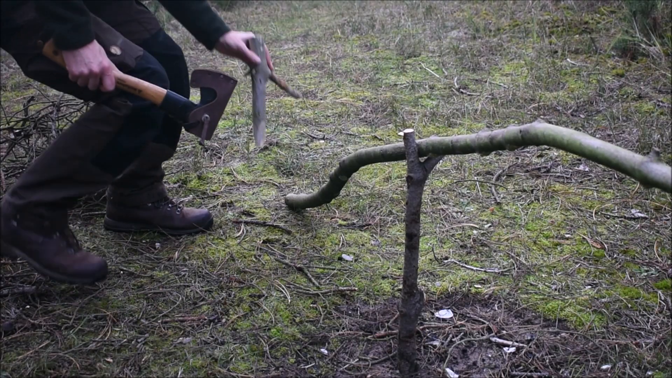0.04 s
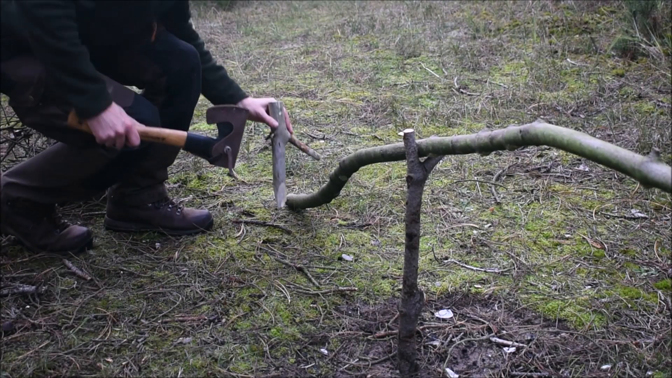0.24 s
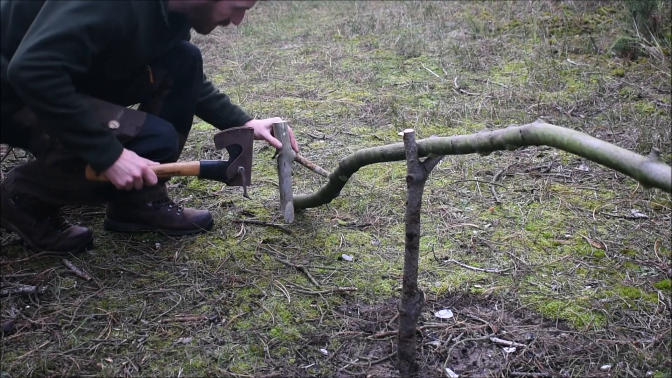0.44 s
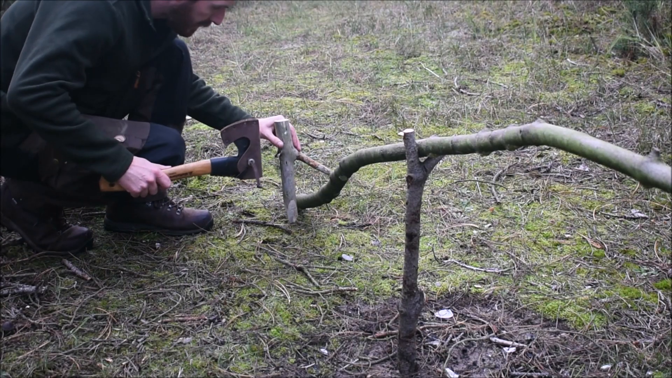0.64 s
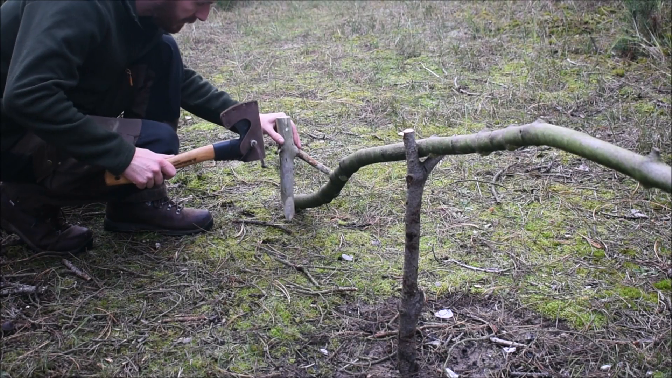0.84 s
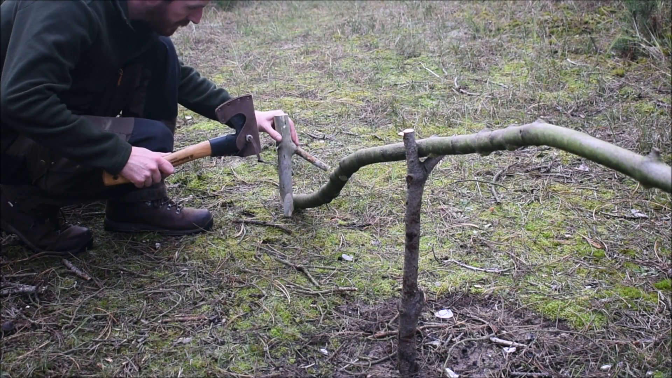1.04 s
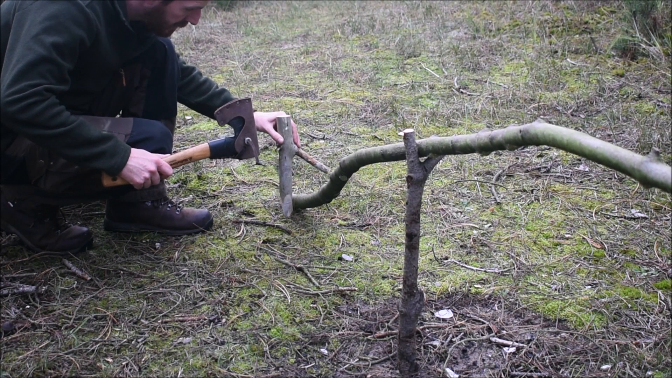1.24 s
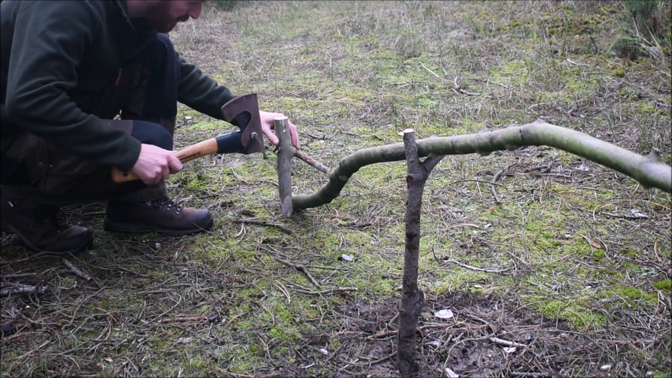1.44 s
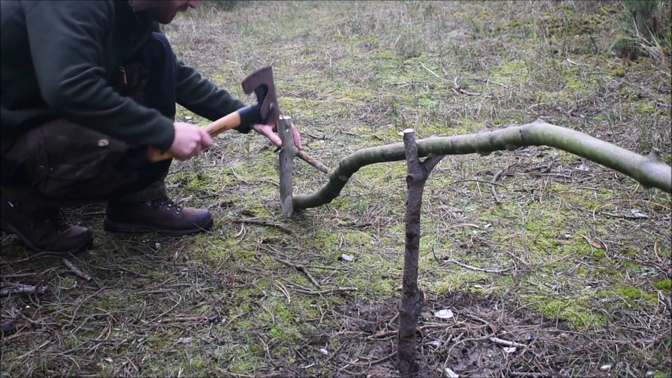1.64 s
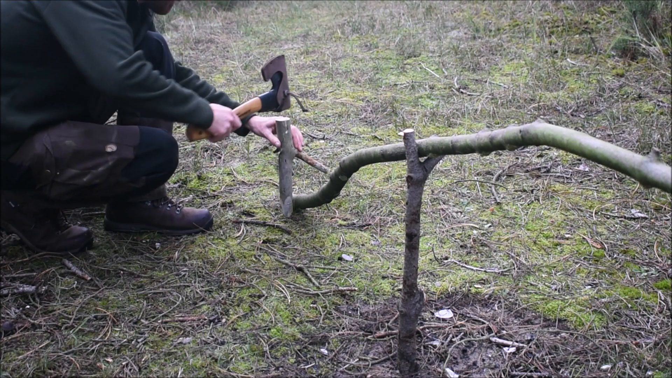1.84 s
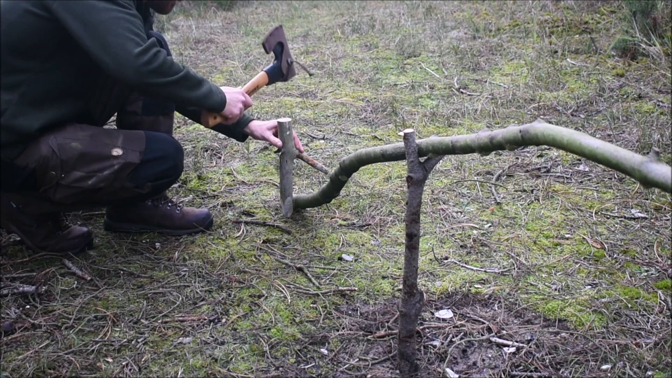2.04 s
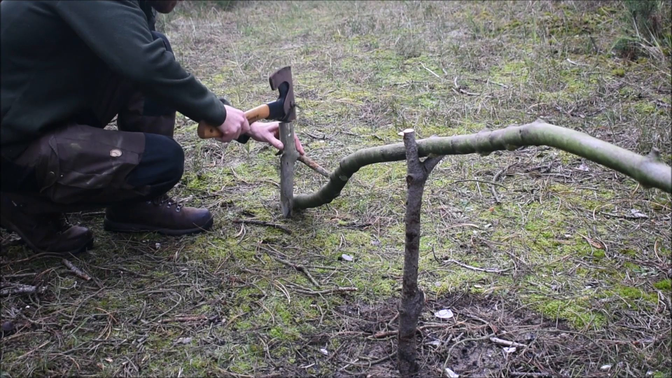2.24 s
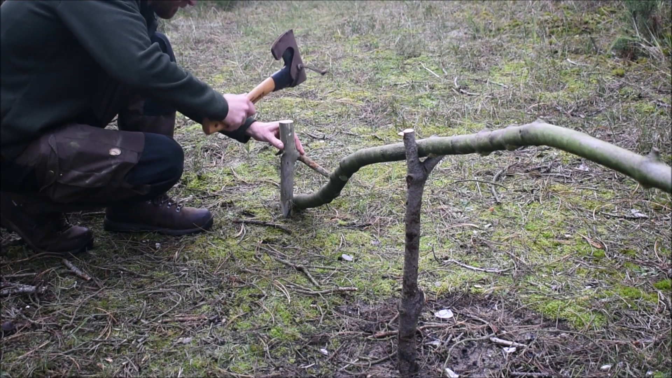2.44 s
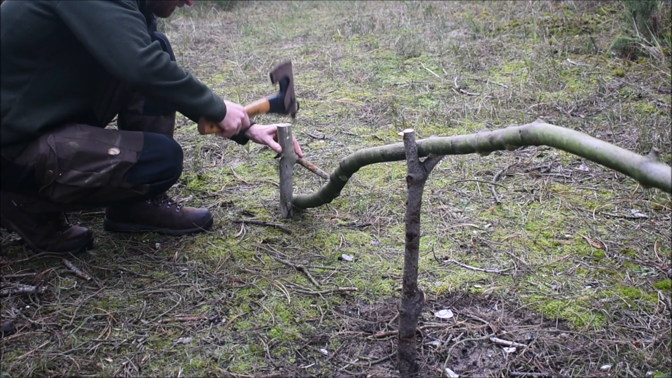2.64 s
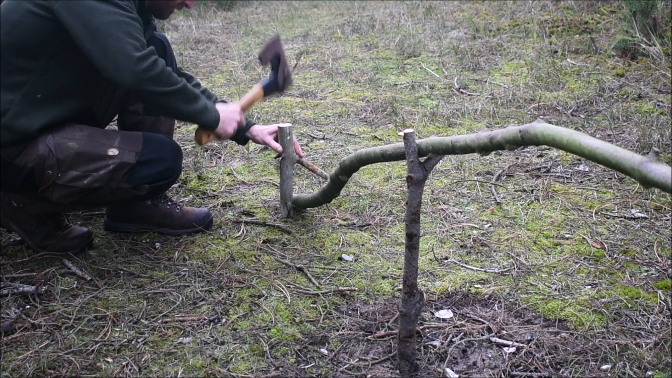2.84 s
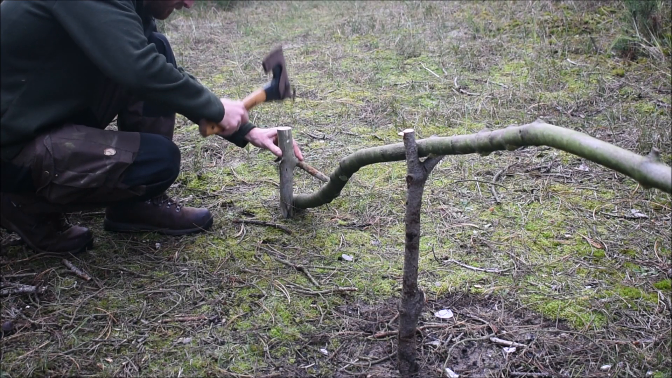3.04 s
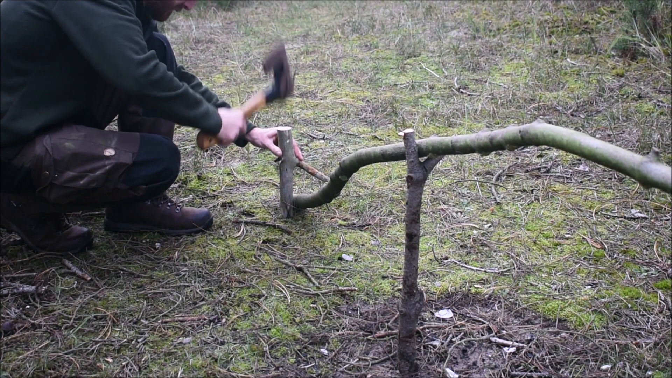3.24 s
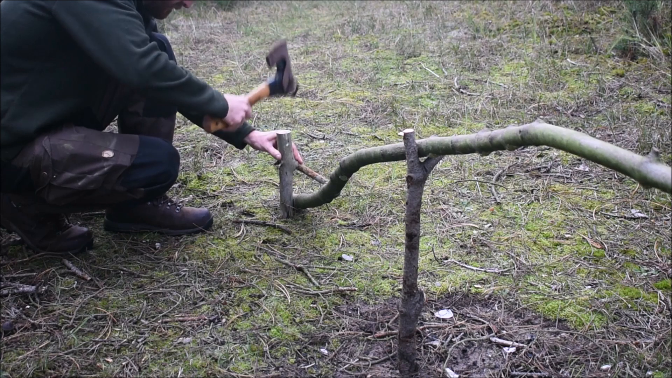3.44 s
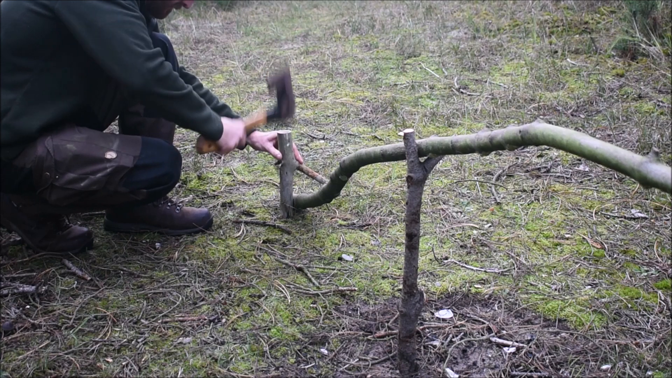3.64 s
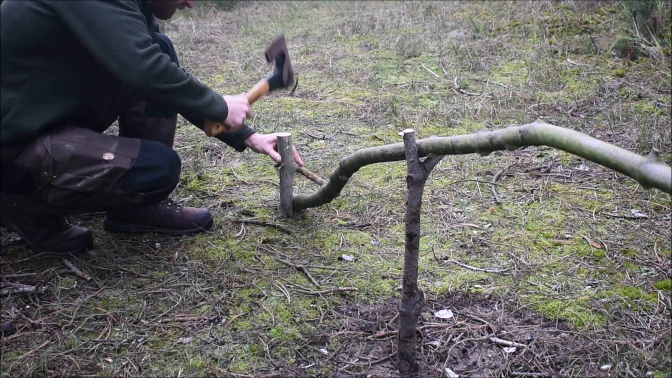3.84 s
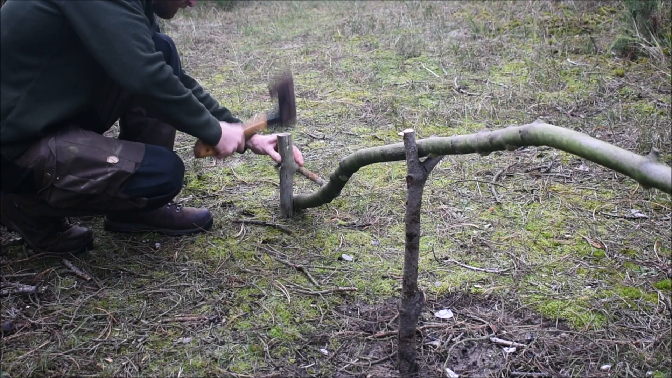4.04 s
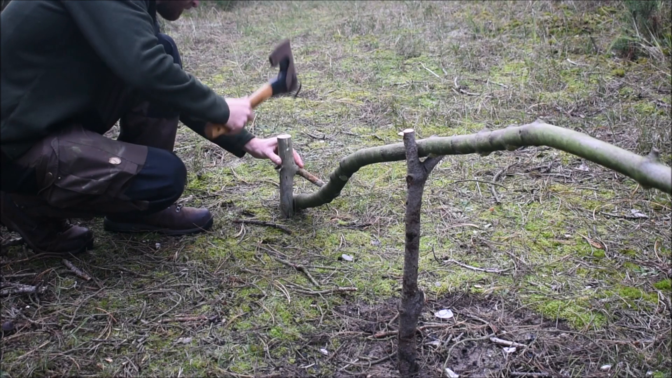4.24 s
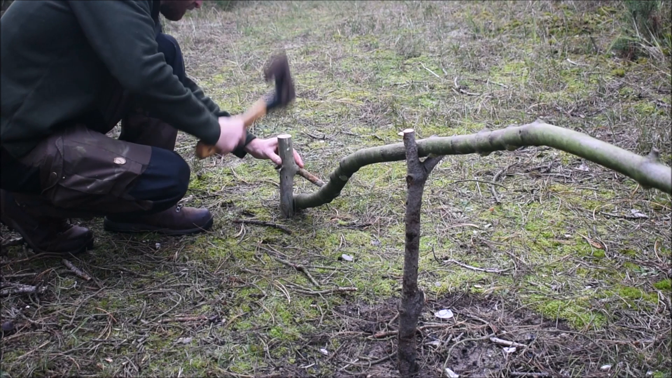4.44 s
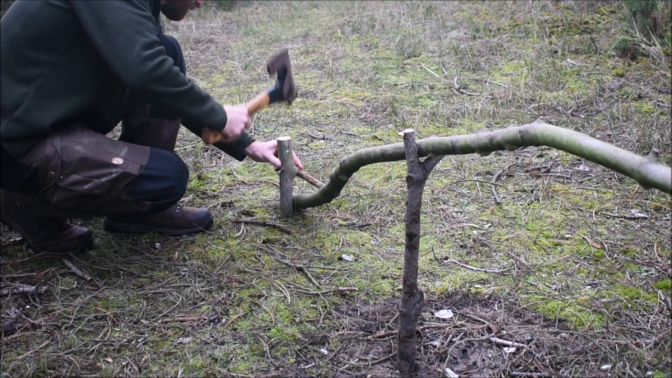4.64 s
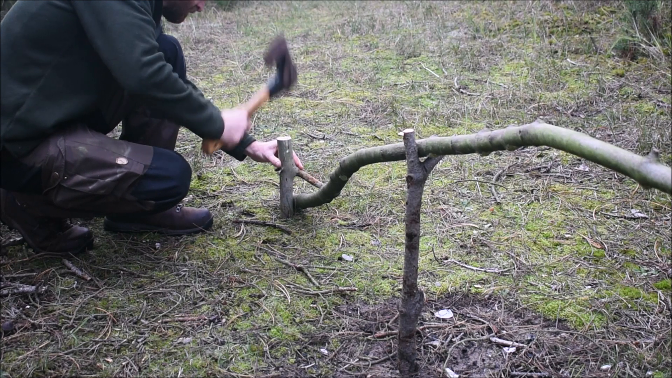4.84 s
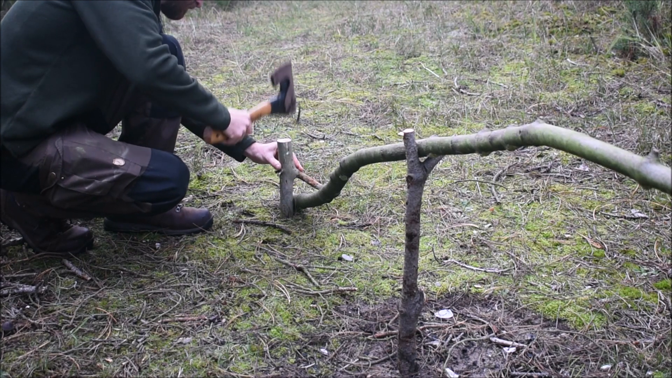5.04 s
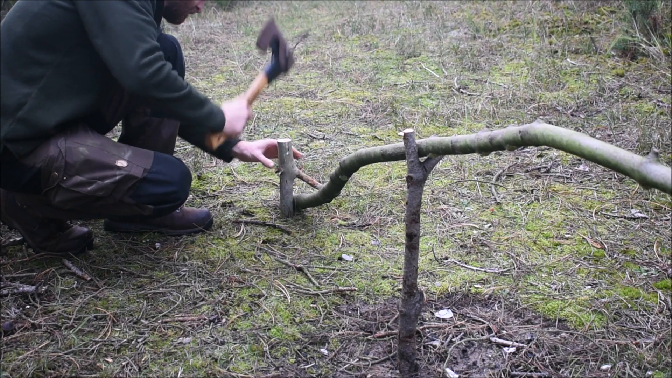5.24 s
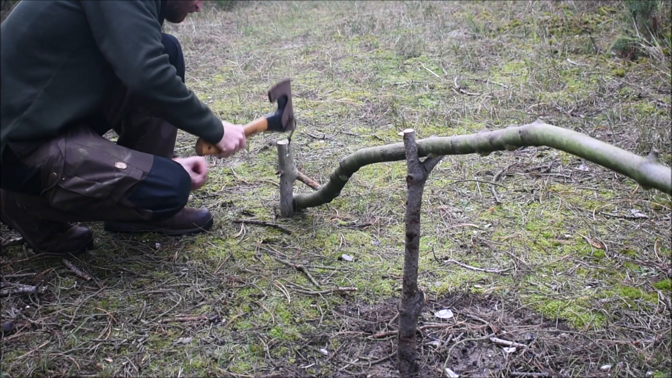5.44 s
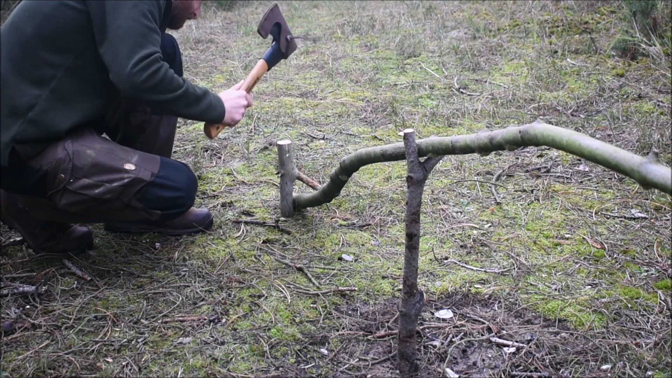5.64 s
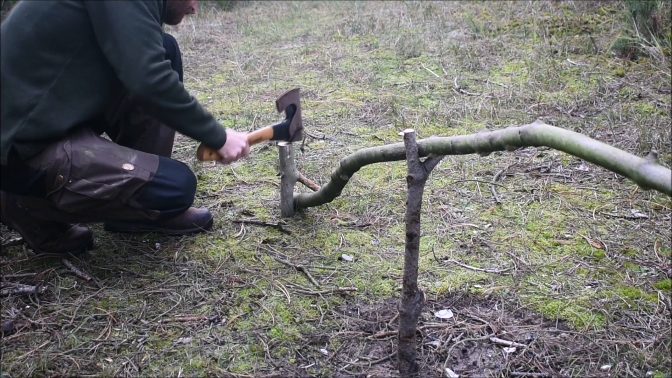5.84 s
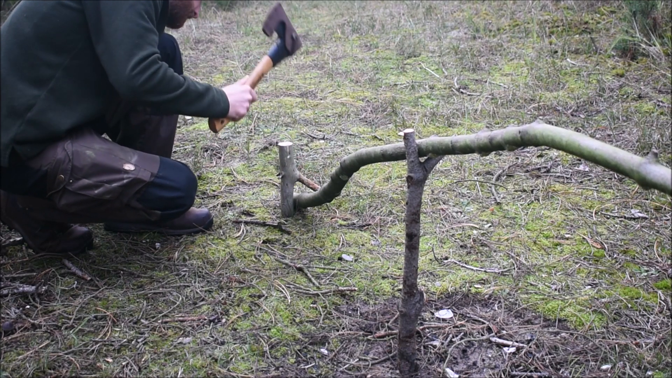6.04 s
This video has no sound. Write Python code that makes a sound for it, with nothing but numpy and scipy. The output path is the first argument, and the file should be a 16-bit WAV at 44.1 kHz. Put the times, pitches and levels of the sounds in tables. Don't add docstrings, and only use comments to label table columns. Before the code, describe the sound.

Ten sharp hatchet knocks drive a green wooden peg into forest soil, growing firmer and louder, with wind puffing on the microphone.

```python
import sys
import numpy as np
from scipy import signal
from scipy.fft import rfft, irfft, next_fast_len
from scipy.io import wavfile
from scipy.ndimage import uniform_filter1d, map_coordinates

SR = 44100
rng = np.random.default_rng(int(sys.argv[2]) if len(sys.argv) > 2 else 0)


def to_wav(s):
    ch = np.atleast_2d(s).T
    pcm = np.round(np.clip(ch, -1, 1) * 32767)
    wavfile.write(sys.argv[1], SR, pcm.astype(np.int16))


def how_loud(loudness_db):
    steps = np.asarray(loudness_db, float) / 20
    return 10 ** steps


N = 269010

# start in seconds, peak level in dB, bending pitch in Hz, upper modes in dB, crack in dB.
BLOWS = [
    (2.239, -7, 1257, -19.5, -27.5),
    (2.575, -7.5, 1231, -14.5, -23.5),
    (2.929, -5, 1152, -18, -25),
    (3.315, -2.5, 1286, -10, -18),
    (3.696, 0.5, 1235, -10, -16.5),
    (4.094, -1.5, 1267, -10, -22),
    (4.512, 0, 1157, -12.5, -16.5),
    (4.93, -2, 1320, -7.5, -15.5),
    (5.353, 1.5, 1590, -11.5, -15),
    (5.8115, 0, 1228, -19.5, -17),
]
# delay in ms, level in dB.
REBOUNDS = [(5.9, -9.5), (4.8, -11), (2.4, -12), (3.5, -17), (2.45, -25), (5.5, -16), (4.5, -12.5),
            (4.6, -15.5), (2.9, -15), (8.7, -25)]
# low bending modes in dB, high bending modes in dB.
AIM = [(-3, 0.5), (-1.5, 2.5), (2.5, -1.5), (1.5, -3), (-1, -10), (2, -8), (4.5, -2), (-1, -10),
       (-1.5, -2.5), (3.5, 2)]
# share of pitch, level in dB, share of t60.
BENDING_MODES = [(0.584, -11.5, 1.46), (.78, 0.5, 0.5), (0.997, 2, 0.89), (1.308, -7, 1.48),
                 (1.46, -4.5, .95), (1.614, -1.5, 0.54)]
# frequency in Hz, level in dB.
UPPER_MODES = [(2280, -2.5), (2890, 0.5), (3500, -27), (4200, -10), (5200, -13.5), (8600, -20),
               (10400, -15.5)]
# frequency in Hz, level in dB.
CRACK_SPECTRUM = [(1500, 14), (3000, 17), (5000, 7.5), (8600, 4.5), (12000, -1), (16500, -10)]
# frequency in Hz, t60 in seconds.
TREE_DECAY = [(300, 0.3), (1000, 0.17), (3000, 0.46), (8000, 0.45), (15000, 0.27)]
# frequency in Hz, level in dB per Hz.
BARK_SPECTRUM = [(290, 0.5), (500, -6), (1100, -3), (2320, -2.5), (3800, -11), (5000, -8), (6500, -19),
                 (8700, -16), (11500, -22.5), (14300, -29), (16000, -47)]
# centre in seconds, peak level in dB, frequency in Hz.
PUFFS = [(.063, -24, 155), (.102, -29, 141), (.82, -29.5, 128), (1.379, -39, 129), (1.426, -34.5, 91),
         (2.681, -31, 109), (2.697, -28, 88), (2.71, -24, 105), (2.805, -30.5, 85.5), (2.834, -28, 81),
         (3.182, -33, 101), (4.079, -22, 122), (4.136, -16, 141), (4.213, -23.5, 150), (4.238, -28, 131),
         (4.272, -29.5, 125), (4.287, -29, 119), (4.362, -22, 145), (4.737, -29.5, 134),
         (4.855, -28, 116.7), (4.916, -16.5, 153), (5.333, -26, 112), (5.591, -26, 158),
         (5.608, -28.5, 130), (5.745, -27, 95), (5.777, -21.5, 132), (5.789, -21.5, 108), (5.804, -23, 160),
         (5.833, -20, 149), (5.846, -21, 161)]
# frequency in Hz, level in dB per Hz.
EDDY_SPECTRUM = [(12, -48), (20, 1), (76, 5.5), (229, -10.5), (403, -26.5), (449, -19), (500, -22),
                 (650, -51), (1100, -120)]
# start in seconds, hold in seconds, strength in dB.
GUSTS = [(0.028, 0.081, -37.5), (.15, 0.076, -43.5), (0.477, 0.016, -43.5), (0.647, 0.061, -53.5),
         (0.824, .03, -43), (0.918, 0.036, -48), (1.02, 0.036, -56), (1.298, 0.12, -45),
         (1.568, 0.081, -45), (1.714, 0.31, -62), (2.357, 0.029, -51.5), (2.67, 0.047, -34),
         (2.812, 0.042, -40.5), (2.924, .03, -52), (3.13, 0.064, -43), (3.297, 0.07, -58),
         (3.743, 0.046, -62), (3.974, 0.022, -48.5), (4.045, .12, -35.5), (4.206, 0.18, -35.5),
         (4.52, 0.026, -44), (4.599, .01, -43), (4.737, 0.029, -33.5), (4.858, 0.076, -31),
         (5.132, .04, -44), (5.292, 0.093, -37.5), (5.425, 0.11, -50), (5.587, 0.023, -46),
         (5.694, 0.16, -34.5), (5.868, .12, -34.5)]
# start in seconds, peak level in dB, frequency in Hz.
TICKS = [
    (0.1436, -35, 12800),
    (1.0455, -50, 10100),
    (1.0597, -42, 10400),
    (1.464, -46, 5750),
    (2.4014, -50, 6250),
    (2.4725, -40.5, 5370),
    (3.9784, -42, 5160),
    (4.8076, -39.5, 8600),
]
# frequency in Hz, level in dB per Hz.
TRAFFIC_SPECTRUM = [(150, -16), (250, -8.5), (492, -1.5), (857, -1), (1070, -4.5), (1250, -6), (2150, -13),
                    (3040, -18.5), (3320, -19.5), (3740, -21), (12600, -37), (15800, -54)]
# frequency in Hz, level in dB per Hz.
RUMBLE_SPECTRUM = [(12, -30), (25, -4), (60, 2), (120, -27), (200, -49)]
DROPOUTS_S = [.211, .401, .719, 1.0, 1.148, 1.277, 2.001, 2.065, 2.129, 2.534, 3.259, 3.388, 4.604, 5.309]

GRIP_AFTER_BLOWS, GRIP_OVER_BLOWS = 1.6, 0.57
FREE_T60_S, HELD_T60_S = 0.058, 0.019
FREE_CRACK_MS, HELD_CRACK_MS = 1.9, 0.52
FREE_THUD_DB, HELD_THUD_DB = -42, -21.5
FREE_RISE_MS, HELD_RISE_MS = 0.42, 0.56
BLOW_LOW_CUT_HZ = 517
TREES_DB, ECHO_COLOUR = -41.5, 0.53
LULL_DB, SWELL_DB_PER_S, FADE_DB_PER_S = -61.5, 796, 645
BOOT_S, BOOT_DB, BOOT_PRESS_S, BOOT_LIFT_S = 0.172, -54.5, 0.011, 0.015
SETTLE_DB, SETTLE_S, LITTER_DB = -69.5, 0.19, -71.5
TRAFFIC_DB, RUMBLE_DB = -53, -65.0


def unit(x):
    return x / np.sqrt(np.mean(x ** 2) + 1e-20)


def along(points, hz):
    f, v = np.transpose(points)
    return np.interp(np.log(hz + 1), np.log(f + 1), v)


def wobble(rate_hz):
    knots = rng.standard_normal(int(N * rate_hz / SR) + 4)
    return map_coordinates(knots, [np.arange(N) * rate_hz / SR])


def coloured(x, spectrum):
    m = next_fast_len(len(x) + 8192)
    gain = how_loud(along(spectrum, np.fft.rfftfreq(m, 1 / SR)))
    return irfft(rfft(x, m) * gain, m)[:len(x)]


def patchy(shape, bins, frames):
    field = uniform_filter1d(rng.standard_normal(shape), bins, 0)
    return unit(uniform_filter1d(field, frames, 1))


def add(track, start_s, sound):
    part = track[max(round(start_s * SR), 0):][:len(sound)]
    part += sound[:len(part)]


def later(x, ms):
    return np.pad(x, (max(round(ms * SR / 1000), 0), 0))[:len(x)]


def hatchet():
    out, t = np.zeros(N), np.arange(SR // 8) / SR
    luck = rng.standard_normal((len(BLOWS), len(BENDING_MODES) + len(UPPER_MODES), 3))
    free = np.array([FREE_T60_S, FREE_CRACK_MS, FREE_THUD_DB, FREE_RISE_MS])
    firm = np.array([HELD_T60_S, HELD_CRACK_MS, HELD_THUD_DB, HELD_RISE_MS])
    low_cut = signal.butter(4, BLOW_LOW_CUT_HZ, 'high', fs=SR, output='sos')
    driven = 1 + 1.04 * np.exp(-(t / 0.0011) ** 2)
    for k, (start_s, db, pitch_hz, upper_db, crack_db) in enumerate(BLOWS):
        back_ms, back_db = REBOUNDS[k]
        held = 1 / (1 + np.exp((GRIP_AFTER_BLOWS - k) / GRIP_OVER_BLOWS))
        t60_s, crack_ms, thud_db, rise_ms = free + held * (firm - free)

        wood = driven * peg_bending(t, pitch_hz, t60_s, AIM[k], luck[k])
        grain = driven * end_grain(t, upper_db, luck[k, len(BENDING_MODES):])
        wood += later(grain, crack_ms - 0.4)
        wood += later(crack(t, crack_db), crack_ms)
        rise = 1 - np.exp(-(1000 * t / rise_ms) ** 2)
        blow = signal.sosfilt(low_cut, how_loud(db - 3) * wood * rise)

        contact = blow * np.exp(-(t / 0.0064) ** 2)
        contact = held * contact + (1 - held) * uniform_filter1d(contact, size=9)
        rebound = how_loud(back_db) * later(contact, back_ms)
        add(out, start_s - 0.00015 * crack_ms, blow + rebound + how_loud(db + thud_db) * soil_thud(t))
        bright_db = 1.44 * (crack_db + 13.5)
        add(out, start_s, how_loud(db + TREES_DB - 11) * trees(bright_db, blow))
    return out


def ring(t, hz, db, t60_s, luck):
    late = np.maximum(t - 0.0004096 * luck[1] ** 2, 0)
    strength = np.sign(luck[1]) * how_loud(db + luck[0])
    return strength * how_loud(-60 * late / t60_s) * np.sin(2 * np.pi * hz * (1 + 0.0093 * luck[2]) * late)


def peg_bending(t, pitch_hz, t60_s, aim, luck):
    low_db, high_db = aim
    out = 0
    for (share, db, life), d in zip(BENDING_MODES, luck):
        db = db - 9.5 + low_db * (share < 0.9) + high_db * (share > 1.2)
        out = out + ring(t, pitch_hz * share, db, life * t60_s, d)
    return out


def end_grain(t, upper_db, luck):
    return sum(ring(t, hz, db + upper_db + 4, 0.016, d) for (hz, db), d in zip(UPPER_MODES, luck))


def crack(t, crack_db):
    grit = unit(coloured(rng.standard_normal(len(t)), CRACK_SPECTRUM))
    return how_loud(crack_db + 13) * grit * (how_loud(-60 * t / 0.0074) + 0.16 * how_loud(-60 * t / 0.031))


def soil_thud(t):
    tones = sum(np.sin(2 * np.pi * hz * t) for hz in (170, 290, 460))
    return tones * how_loud(-60 * t / 0.036) * (1 - np.exp(-t / 0.0021))


def trees(bright_db, blow):
    hz, t, z = signal.stft(rng.standard_normal(SR // 2), SR, nperseg=256)
    colour_db = along(BARK_SPECTRUM, hz) + along([(1800, 0), (6000, bright_db)], hz)
    own_db = 20 * np.log10(np.abs(rfft(blow[:256])) + 1e-3)
    colour_db += ECHO_COLOUR * (own_db - uniform_filter1d(own_db, size=11))
    trunks_db = 1.2 * patchy(z.shape, 4, 8)
    decay_db = -60 * t / along(TREE_DECAY, hz)[:, None]
    tail = signal.istft(z * how_loud(trunks_db + colour_db[:, None] + decay_db), SR, nperseg=256)[1]
    t = np.arange(len(tail)) / SR
    tail *= (1 - np.exp(-(t / 0.016) ** 2)) * (1 + 2.6 * np.exp(-t / 0.019))
    return later(unit(tail[:SR // 2]), 11)


def wind():
    kicks = (rng.random(N) < 90 / SR) * how_loud(3.7 * rng.standard_normal(N))
    lumps = unit(coloured(kicks, EDDY_SPECTRUM))
    lumps += 0.5 * unit(coloured(rng.standard_normal(N), EDDY_SPECTRUM))
    lumps /= np.abs(uniform_filter1d(lumps ** 2, size=3000)) ** 0.6
    out = how_loud(gusts() - 3.0 + 0.43 * wobble(25)) * unit(lumps)
    t = np.arange(-800, 800) / SR
    for centre_s, db, hz in PUFFS:
        u = (1.4 * np.pi * hz * t) ** 2
        add(out, centre_s - 0.016, how_loud(db - 1.0) * (1 - 1.09 * u) * np.exp(-u))
    return out


def gusts():
    start, hold, db = np.transpose(GUSTS)[..., None]
    t = np.arange(0, N, 64) / SR
    swell_db = SWELL_DB_PER_S * np.maximum(start - t, 0)
    fade_db = FADE_DB_PER_S * np.maximum(t - start - hold, 0)
    total = how_loud(db - swell_db - fade_db).sum(0) + how_loud(LULL_DB)
    return np.interp(np.arange(N) / SR, t, 20 * np.log10(total))


def litter():
    grains = rng.standard_normal(N) * how_loud(4.6 * rng.standard_normal(N) + 1.7 * wobble(120))
    moss = [(1200, -4), (3000, -2.0), (8000, 1), (15700, -5.5), (16000, -45)]
    out = boot() * unit(coloured(grains, moss))
    t = np.arange(SR // 100) / SR
    for start_s, db, hz in TICKS:
        noise = rng.standard_normal(len(t))
        snap = unit(coloured(noise, [(0.24 * hz, -25), (hz, 0), (1.45 * hz, -18)]))
        add(out, start_s, how_loud(db - 8.0 - 60 * t / 0.0096) * snap)
    return out


def boot():
    t = np.arange(N) / SR - BOOT_S
    crush = np.exp(-np.abs(t) / np.where(t < 0, BOOT_PRESS_S, BOOT_LIFT_S))
    return how_loud(BOOT_DB) * crush + how_loud(SETTLE_DB) * np.exp(-(t / SETTLE_S) ** 2) + how_loud(LITTER_DB)


def distance():
    z = signal.stft(rng.standard_normal(N), nperseg=512)[2]
    hum = signal.istft(z * how_loud(1.1 * patchy(z.shape, 6, 14)), nperseg=512)[1][:N]
    spectrum = TRAFFIC_SPECTRUM[:-2] + [(12600, -36.0), (15700, -48), (16000, -83)]
    traffic = how_loud(TRAFFIC_DB + 0.72 + 0.42 * wobble(3.36)) * unit(coloured(hum, spectrum))
    return traffic + how_loud(RUMBLE_DB) * unit(coloured(rng.standard_normal(N), RUMBLE_SPECTRUM))


def scene():
    return (hatchet() + wind() + litter() + distance())[None]


def gain_control(x, from_db, depth, attack_s, release_s):
    over = np.maximum(20 * np.log10(np.abs(x) + 1e-9) - from_db, 0)
    t = np.arange(SR // 8) / SR
    lag = (1 - np.exp(-(t / attack_s) ** 2)) * np.exp(-t / release_s)
    return x * how_loud(-depth * signal.fftconvolve(over, lag)[:N] * 1000 / SR)


def treble_dropouts(x):
    hz, t, z = signal.stft(x, SR, nperseg=512)
    dip = sum(np.exp(-((t - s) / 0.0063) ** 4) for s in DROPOUTS_S)
    kept = uniform_filter1d(rng.standard_normal((len(hz), len(DROPOUTS_S))), 3, 0) > 0.8
    nearest = np.abs(t[:, None] - DROPOUTS_S).argmin(1)
    loss_db = -17 * dip * (hz > 3800)[:, None] * ~kept[:, nearest]
    return signal.istft(z * how_loud(loss_db), SR, nperseg=512)[1][:N]


def top_cut(x):
    return signal.sosfilt(signal.butter(12, 17040, fs=SR, output="sos"), x)


def record(dry):
    clipped = dry[0] / (1 + np.abs(dry[0] / 0.55) ** 6) ** (1 / 6)
    ducked = gain_control(clipped, from_db=-13, depth=4.64, attack_s=0.0083, release_s=0.0084)
    band = [(15, -20), (40, -5.5), (90, 0), (16300, 0), (16800, -9), (17100, -90)]
    limited = coloured(treble_dropouts(ducked), band)
    return top_cut(limited[None])


dry = scene()
out = record(dry)
to_wav(out)
```